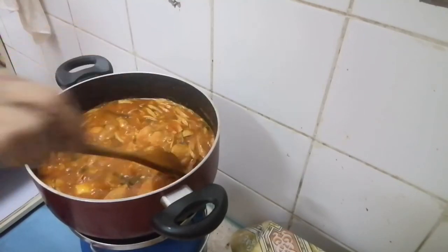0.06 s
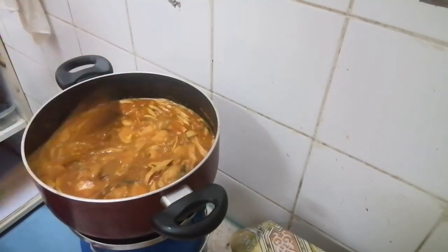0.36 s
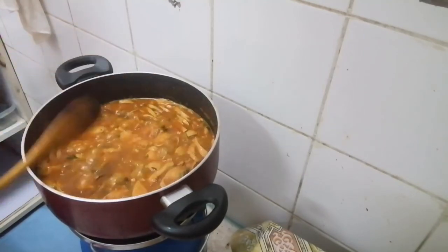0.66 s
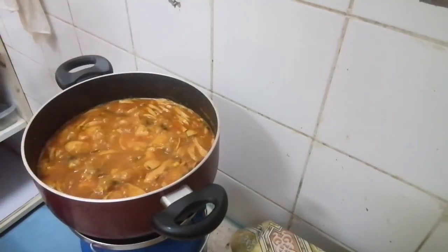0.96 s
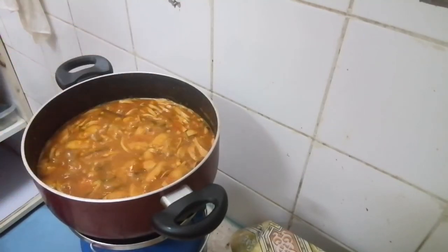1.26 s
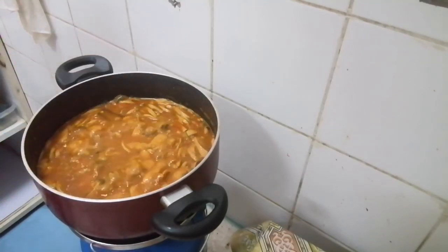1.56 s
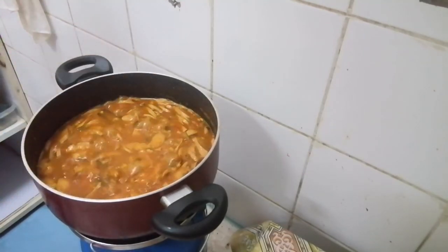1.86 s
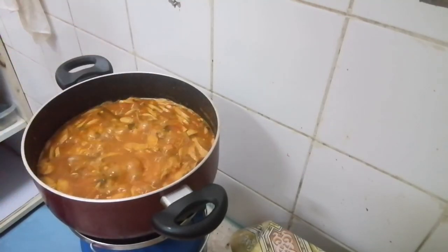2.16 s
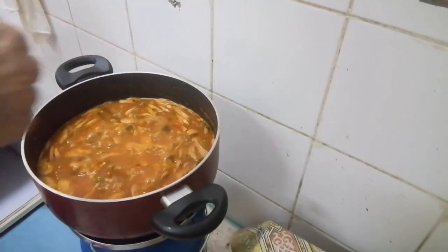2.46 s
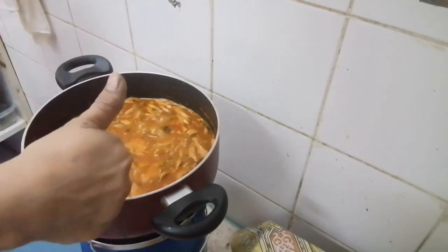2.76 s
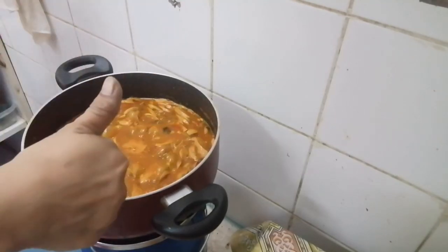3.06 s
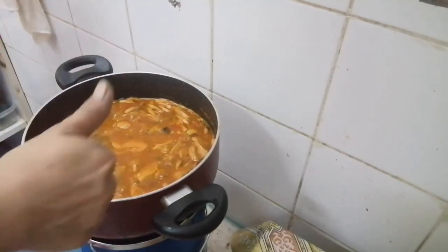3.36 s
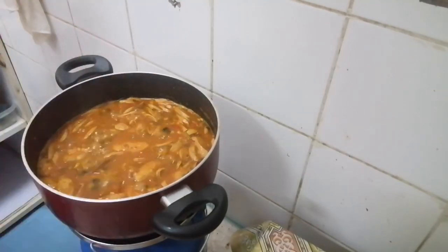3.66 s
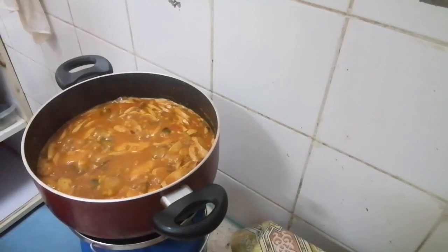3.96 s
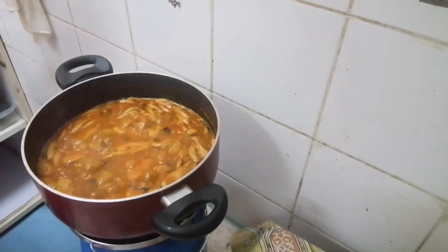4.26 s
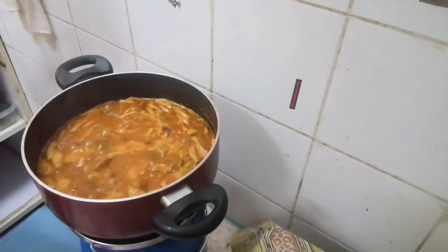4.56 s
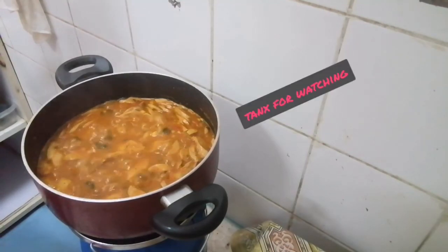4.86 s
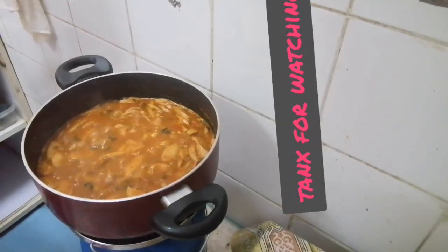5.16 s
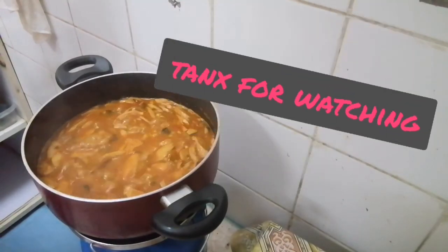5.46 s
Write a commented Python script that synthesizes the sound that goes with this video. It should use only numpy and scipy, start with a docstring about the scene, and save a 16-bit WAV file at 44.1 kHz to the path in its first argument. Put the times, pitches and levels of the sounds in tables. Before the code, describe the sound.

A wooden spoon knocks on a metal pot and is set down with a thud, as stew simmers and plops over a gas flame.

```python
"""The tiled corner of a small kitchen: a thick stew simmers in a metal pot on a gas burner.
Bubbles plop as their cavities ring open, and films of sauce snap in sharp spits. A wooden spoon raps
the rim three times, ringing the pot, then is put down with a clatter and dull thuds; the room booms low.
Underneath, the gas hisses and the flame keeps up a soft roar and a fluttering rumble."""
import sys
import numpy as np
from scipy import signal
from scipy.fft import rfft, irfft, next_fast_len
from scipy.io import wavfile

SR = 44100
rng = np.random.default_rng(int(sys.argv[2]) if len(sys.argv) > 2 else 0)


def waveform_to_disk(signal):
    """Save audio, clipped to [-1, 1], as 16-bit WAV at the path in sys.argv[1]."""
    frames = np.transpose(np.atleast_2d(signal))
    scaled = np.clip(frames, -1, 1) * 32767
    samples = np.round(scaled).astype(np.int16)
    wavfile.write(sys.argv[1], SR, samples)


N = 247823


def plops(level_db=1.5):
    """The largest bubbles burst in the pot; now and then something small pings."""
    # large bubbles: t/s, level/dB, f/Hz
    large = [(0.403, -32.5, 880), (0.674, -35.5, 1510), (0.869, -38, 1100), (1.522, -39, 1730),
             (1.856, -39, 760), (1.965, -34.5, 1190), (2.213, -32.5, 990), (2.263, -35, 1600),
             (2.395, -39, 1150), (2.631, -40, 910), (2.729, -35, 1240), (3.069, -36.5, 960),
             (3.424, -37.5, 1250), (3.483, -38.5, 980), (3.823, -31.5, 1290), (4.064, -33.5, 2070),
             (4.162, -34.5, 1050), (4.189, -30, 1150), (4.417, -39.5, 1650), (4.715, -40, 940),
             (5.079, -35.5, 1010), (5.323, -38.5, 1070)]
    # small sharp pings: t/s, level/dB, f/Hz
    pings = [(1.385, -32, 3800), (2.672, -26, 3830), (3.146, -32, 3140), (3.154, -45, 4900),
             (3.221, -40, 2100)]
    stew, pinging = np.zeros(N), np.zeros(N)
    for s, db, hz in large:
        add(stew, s, gain_of(db) * burst(hz, rng.random((2, 2))))
    for s, db, hz in pings:
        add(pinging, s, gain_of(db) * bubble(hz, cycles=2.5, glide=.02))
    return gain_of(level_db) * in_pot(stew) + kitchen(pinging, scatter_db=-4, tail_db=1)


def blips(per_s=8, level_db=-44.5, spread_db=2, centre_hz=1106, octaves=.7,
          stirred_db=-14, recover_s=2.3):
    """Middling bubbles surface at a loose pace, louder as the stew recovers from stirring."""
    out = np.zeros(N)
    for k in range(round(per_s * N / SR)):
        late, size, pitch = rng.random(3)
        s = (k + late) / per_s
        db = level_db + spread_db * (2 * size - 1) + stirred_db * max(1 - s / recover_s, 0)
        hz = centre_hz * 2 ** (octaves * (2 * pitch - 1))
        add(out, s, gain_of(db) * burst(hz, rng.random((2, 2))))
    return in_pot(out)


def simmer(per_s=150, level_db=-56, spread_db=3, low_hz=600, high_hz=1700, pitches=24):
    """A bed of many small bubbles bursting at random."""
    out = np.zeros(N)
    shapes = [bubble(hz, cycles=1, glide=.21) for hz in np.geomspace(low_hz, high_hz, pitches)]
    for when, pitch, chance in rng.random((round(per_s * N / SR), 3)):
        db = spread_db * min(-np.log(chance), 3)
        add(out, when * N / SR, gain_of(db) * shapes[int(pitch * pitches)])
    return gain_of(level_db) * evened(in_pot(out))


def burst(hz, followers, after_db=-10, after_s=.022):
    """A bubble bursts and tears smaller ones with it, one per (delay, pitch) pair in 0..1."""
    out = np.zeros(SR // 10)
    add(out, 0, bubble(hz, cycles=1.3, glide=.051))
    for delay, pitch in followers:
        torn = bubble(hz * 2 ** (1.4 * pitch - .5), cycles=1.8, glide=.12)
        add(out, .003 + after_s * delay, gain_of(after_db) * torn)
    return out


def bubble(hz, cycles, glide):
    """The cavity of a bursting bubble rings for a few cycles, rising in pitch as it opens."""
    turns = np.arange(SR // 30) / SR * hz
    age = turns / cycles
    bend = 1 + glide * (1 - np.exp(-age / 2))
    attack = 1 - np.exp(-turns ** 2 * 2)
    wave = np.sin(2 * np.pi * turns * bend) * np.exp(-age) * attack
    return wave / abs(wave).max()


def in_pot(x):
    """Bubbles set the air in the pot ringing, then spread into the room."""
    # resonances of the air above the stew: f/Hz, width/Hz, level/dB
    cavity = [(742, 29, 3), (938, 30, 0.5), (1279, 35, 0.5)]
    hollow = x + sum(gain_of(db) * resonate(x, hz, width) for hz, width, db in cavity)
    return kitchen(hollow, scatter_db=-8, tail_db=-6, scatter_s=.008)


def spits(fizz_per_s=20, fizz_db=-30, spread_db=3):
    """Tiny films of sauce snap: a few sharp ticks over a faint crackle."""
    # the sharp ticks: t/s, level/dB
    ticks = [(0.888, -21), (2.8785, -21), (3.155, -9), (4.0845, -14), (5.170, -22)]
    # spectrum of one snap: f/Hz, level/dB
    colour = [(500, -38), (2000, -2), (3200, -11), (4200, -6.5), (6500, -7.5), (9600, -1.5), (12000, -8),
              (15000, -28)]
    snapping = rng.random(N) < fizz_per_s / SR
    snaps = snapping * gain_of(fizz_db + spread_db * np.minimum(rng.exponential(1, N), 3))
    for s, db in ticks:
        add(snaps, s, gain_of([db]))
    crackle = signal.oaconvolve(snaps, click(colour))[:N]
    return kitchen(crackle, scatter_db=6, tail_db=0, scatter_s=.008)


def raps():
    """The spoon cracks against the rim; the room booms low and the pot rings above it."""
    # hits on the rim: t/s, crack level/dB, treble lift/dB, boom level/dB
    hits = [(0.324, 12, -3, -30), (0.515, 11, -3, -34), (0.6957, 8.5, 6, -33.5)]
    # spectrum of wood on the rim: f/Hz, level/dB
    colour = [(330, 1), (500, -25), (760, -0.5), (1000, -3.5), (1250, -18.5), (1620, 2.5), (1950, -0.5),
              (2300, 1.5), (2650, -10.5), (3000, 1), (3900, -32.5), (5300, -17), (6100, -26), (15000, -34)]
    # low boom of the room, then the higher ringing modes of the pot: f/Hz, level/dB, t60/s
    room_and_pot = [(101, -3, .35), (122, -3, .25), (151, -3, .4), (258, -1, .3), (323, -1, .3),
                    (435, -14, .4), (790, -14, .2), (945, -16, .35), (2293, -14, .3), (2963, -14, .3),
                    (4958, -29, .35), (5330, -25, .3)]
    out = np.zeros((2, N))
    for s, db, treble_db, boom_db in hits:
        crack = gain_of(db) * click(colour, treble_db, corner_hz=2430)
        add(out, s, kitchen(crack, scatter_db=4.5, tail_db=1, scatter_s=.006, bass_db=8))
        add(out, s, gain_of(boom_db) * ring(room_and_pot, rise_s=.026, treble_db=treble_db))
    return out


def put_down():
    """The spoon lands off to one side, so mostly the room is heard, booming after each thud."""
    # spoon contacts: t/s, clack level/dB, treble lift/dB, low ring/dB, bright ring/dB
    clatter = [(1.3485, 20.5, -4, -40, -54), (1.3835, 5, 10, -52, -56), (1.5955, 11.5, 7, -40, -40.5)]
    # spectrum of a clack: f/Hz, level/dB
    clack_colour = [(100, 3), (300, -22), (600, -17.5), (1000, -8), (1250, 0.5), (1480, 0), (1850, -18),
                    (2300, -4.5), (2750, -10), (3400, -21.5), (4200, -20), (5000, -22), (6500, -35),
                    (15000, -50)]
    # modes of what the spoon lands on: f/Hz, level/dB, t60/s
    spoon_rest = [(959, 1, .4), (1190, -2, .42), (1287, 0, .3), (1345, -3, .3), (1412, 0, .35),
                  (1453, -3, .3), (2275, -3, .35), (2420, -6, .25), (2708, -3, .3), (3750, 1, .15),
                  (4560, -3, .12), (4750, -1, .16), (4926, -4, .18), (5110, -5, .15), (5270, -6, .2),
                  (5740, -10, .15)]
    # dull blows on the worktop: t/s, boom level/dB, puff level/dB
    thuds = [(1.351, -21, 5), (1.4085, -22.5, 13), (1.4485, -32, 4), (1.6005, -31, 2)]
    # low modes of the room: f/Hz, level/dB, t60/s
    room_modes = [(101.6, 0, .19), (102, -14, .65), (121, -4, .2), (143, -8, .22), (256, -13, .32)]
    # spectrum of a blow's soft attack: f/Hz, level/dB
    puff_colour = [(110, -10), (230, 4), (550, -5), (900, -6), (2000, -22), (6000, -45)]
    out = np.zeros((2, N))
    for s, db, treble_db, ring_db, bright_db in clatter:
        clack = gain_of(db) * click(clack_colour, treble_db, corner_hz=3640)
        add(out, s, kitchen(clack, scatter_db=8, tail_db=10, scatter_s=.014))
        add(out, s, gain_of(ring_db) * ring(spoon_rest, rise_s=.0031, treble_db=bright_db - ring_db))
    for s, boom_db, puff_db in thuds:
        add(out, s, gain_of(boom_db) * ring(room_modes, rise_s=.006))
        add(out, s, gain_of(puff_db) * kitchen(click(puff_colour), scatter_db=6, tail_db=12))
    return out


def click(colour, treble_db=0, corner_hz=3000, size=4096):
    """A minimum-phase click of the given colour; harder contact lifts all above the corner."""
    hz = abs(np.fft.fftfreq(size, 1 / SR))
    shelf_db = treble_db * (1 - 1 / (1 + (hz / corner_hz) ** 10))
    log_gain = np.log(gain_of(curve_at(colour, hz) + shelf_db))
    spectrum = np.exp(np.conj(signal.hilbert(log_gain)))
    return np.fft.ifft(spectrum).real[:size // 2]


def ring(modes, rise_s, treble_db=0):
    """Modes build up and die away; the higher ones reach left and right out of step."""
    t = np.arange(SR // 2) / SR
    out = np.zeros((2, len(t)))
    for hz, db, t60 in modes:
        phase = rng.uniform(-1, 1, (2, 1)) * np.pi * min(hz / 2000, 1)
        envelope = gain_of(db + treble_db * (hz > 3400) - 60 * t / t60)
        out += envelope * np.sin(2 * np.pi * hz * t + phase)
    return out * (1 - np.exp(-t / rise_s))


def burner():
    """The flame roars; the gas hisses, combed by the tiled corner, and whistles faintly."""
    # spectrum of the flame: f/Hz, level/dB
    roar_colour = [(20, -65), (58, -56), (75, -74.5), (130, -75), (150, -73), (210, -86), (260, -77.5),
                   (300, -80.5), (380, -77.5), (600, -83), (1200, -89.5), (1800, -88.5), (3000, -104.5),
                   (5000, -115)]
    # spectrum of the gas: f/Hz, level/dB
    hiss_colour = [(1000, -110), (2800, -92.5), (3700, -99), (4500, -100.5), (5500, -93.5), (6000, -92.5),
                   (6600, -86), (7200, -99), (9000, -99), (10500, -101), (12000, -104), (14000, -109),
                   (14800, -103), (15400, -109)]
    # narrow resonances in the hiss: f/Hz, width of each filter pass/Hz, level/dB
    jet = [(3242, 240, -58), (9670, 390, -67.5)]
    roar = tinted(noise_pair(N) * np.sqrt(SR / 2), roar_colour)
    combed = np.array([kitchen(rng.standard_normal(N), scatter_db=-8, tail_db=2)[side]
                       for side in range(2)])
    hiss = tinted((combed + noise_pair(N)) * np.sqrt(SR) / 2, hiss_colour)
    whistle = np.zeros((2, N))
    for hz, width, db in jet:
        band = resonate(rng.standard_normal((2, N)), hz, width)
        whistle += gain_of(db) * evened(resonate(band, hz, width))
    return roar + hiss + whistle


def rumble(centre_hz=102.7, level_db=-54.5, wander_hz=6, flutter_db=3.5):
    """The flame keeps a low resonance of the corner fluttering; now and then it swells."""
    # bell-shaped swells: centre t/s, half length/s, lift/dB
    swells = [(0.03, .08, 8.5), (2.93, .14, 8.5), (3.86, 0.06, 12), (5.468, 0.094, 13)]
    t = np.arange(N) / SR
    swell_db = sum(db * np.exp(-((t - s) / half_s) ** 2) for s, half_s, db in swells)
    hz = centre_hz + wander_hz * drift(per_s=16)
    tone = evened(np.sin(2 * np.pi * np.cumsum(hz) / SR))
    return gain_of(level_db + swell_db + flutter_db * np.tanh(drift(per_s=11))) * tone


def kitchen(x, scatter_db, tail_db, scatter_s=.01, bass_db=0):
    """Direct sound, echoes off the tiles, quick scatter around the pot and the tail of the room."""
    # tile echoes: left t/s, right t/s, gain
    walls = [(.0016, 0.0024, 0.023), (.0036, .0031, 0), (.0049, 0.0044, 0), (.0069, 0.0053, 0.023)]
    # decay of the room: f/Hz, t60/s
    decay = [(100, 0.57), (400, 0.27), (1200, 0.4), (2800, 0.42), (6000, 0.28), (14000, 0.12)]
    size = SR // 2
    t = np.arange(size) / SR
    near = np.zeros((2, size))
    near[:, 0] = 1
    for left, right, gain in walls:
        near[[0, 1], [round(left * SR), round(right * SR)]] += gain
    scatter = evened(noise_pair(size) * np.exp(-t / scatter_s)) / np.sqrt(size)
    hz, when, bands = signal.stft(noise_pair(size), SR, nperseg=256)
    fade = gain_of(-60 * when / curve_at(decay, hz)[:, None])
    tail = signal.istft(bands * fade, SR, nperseg=256)[1][:, :size]
    build_up = 1 - np.exp(-t / .004)
    tail = tinted(tail, [(400, bass_db), (1400, 0)]) * build_up / np.sqrt(SR * .025)
    response = near / np.linalg.norm(near[0]) + gain_of(scatter_db) * scatter + gain_of(tail_db) * tail
    response /= np.sqrt(1 + gain_of(scatter_db) ** 2 + gain_of(tail_db) ** 2)
    return signal.fftconvolve(x[None], response, axes=1)[:, :N]


def noise_pair(size):
    """White noise at two close microphones: alike in the bass, unrelated in the treble."""
    # stereo image: f/Hz, left-right correlation
    likeness = [(30, 0.78), (90, 0.82), (300, 0.77), (600, 0.65), (1100, -0.31), (1800, -0.16),
                (2800, 0.024), (5000, -0.027), (15000, 0.054)]
    left, unrelated = rfft(rng.standard_normal((2, size)))
    same = np.clip(curve_at(likeness, np.fft.rfftfreq(size, 1 / SR)), -1, 1)
    right = same * left + np.sqrt(1 - same ** 2) * unrelated
    return irfft(np.array([left, right]), size)


def drift(per_s):
    """Slow random wavering of rms 1."""
    lowpass = np.exp(-(np.fft.rfftfreq(N, 1 / SR) / per_s) ** 2)
    return evened(irfft(rfft(rng.standard_normal(N)) * lowpass, N))


def resonate(x, hz, width):
    """A resonance of peak gain 1."""
    return signal.lfilter(*signal.iirpeak(hz, hz / width, SR), x)


def tinted(x, colour):
    """Equalises by a curve of (f/Hz, level/dB) points."""
    size = next_fast_len(x.shape[-1] + 2048)
    gain = gain_of(curve_at(colour, np.fft.rfftfreq(size, 1 / SR)))
    return irfft(rfft(x, size) * gain, size)[..., :x.shape[-1]]


def curve_at(points, hz):
    """Joins points by straight lines over log frequency."""
    f, value = np.transpose(points)
    return np.interp(np.log(hz + 1), np.log(f + 1), value)


def gain_of(db):
    """Decibels to amplitude."""
    return 10 ** (np.asarray(db) / 20)


def evened(x):
    """Scales to rms 1."""
    return x / np.sqrt(np.mean(x ** 2) + 1e-20)


def add(mix, s, sound):
    """Mixes a sound in at time s."""
    part = mix[..., max(round(s * SR), 0):][..., :sound.shape[-1]]
    part += sound[..., :part.shape[-1]]


def scene():
    """Flame, spoon and stew."""
    return burner() + rumble() + raps() + put_down() + plops() + blips() + spits() + simmer()


def record(dry, edge_hz=15350):
    """The left microphone is duller in the top octave; both shed deep bass and the highest treble."""
    # tone of the left microphone: f/Hz, level/dB
    left_mic = [(1000, -0.5), (2000, -1.5), (2800, 1), (3250, -4), (3800, -3), (5500, 5), (6600, -5),
                (7700, -12.5), (10000, -15.5), (12500, -7), (14700, -2)]
    # bass cut on both sides: f/Hz, level/dB
    low_cut = [(25, -15.5), (52, -36), (70, 0)]
    pair = tinted(np.array([tinted(dry[0], left_mic), dry[1]]), low_cut)
    lowpass = signal.firwin(511, edge_hz, window=("kaiser", 9), fs=SR)
    return signal.oaconvolve(pair, lowpass[None], "same")


dry = scene()
out = record(dry)
waveform_to_disk(out)
```